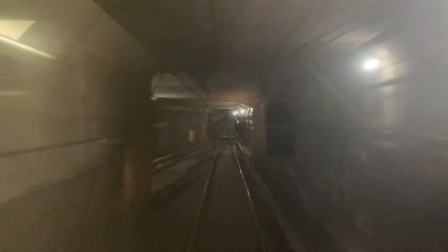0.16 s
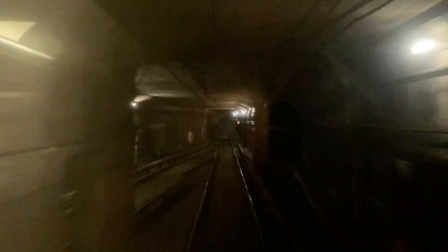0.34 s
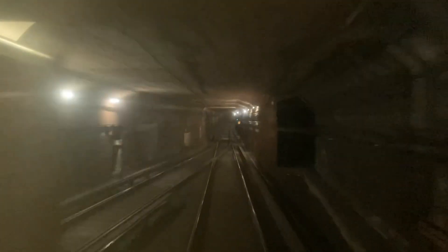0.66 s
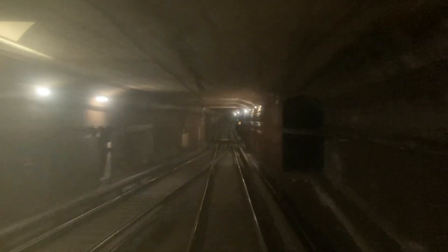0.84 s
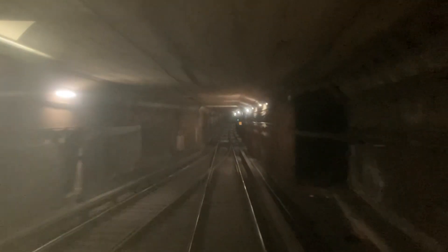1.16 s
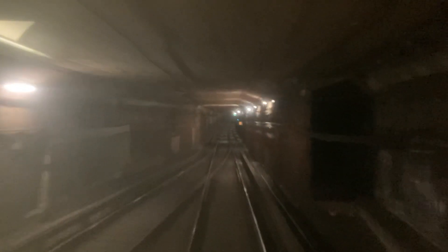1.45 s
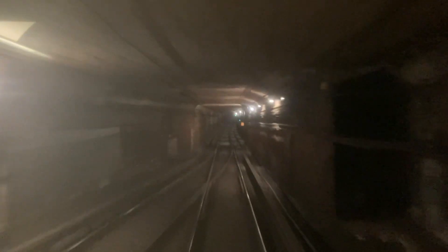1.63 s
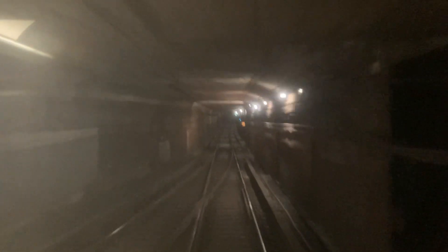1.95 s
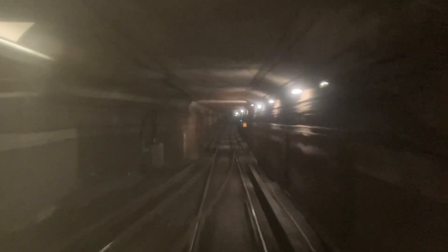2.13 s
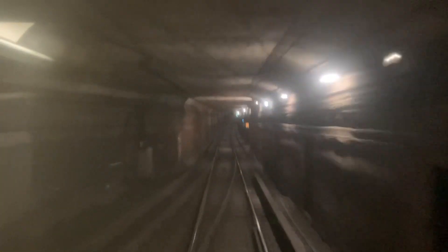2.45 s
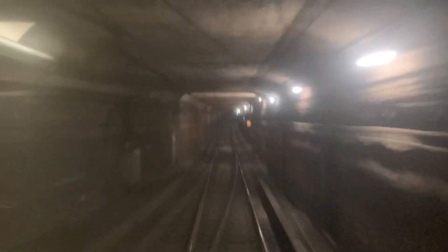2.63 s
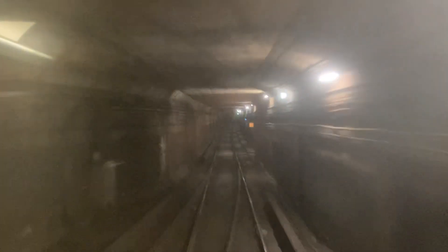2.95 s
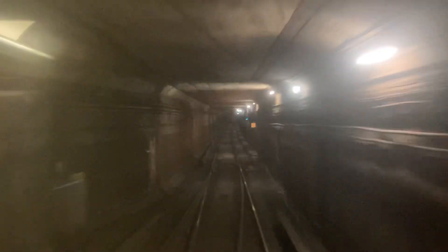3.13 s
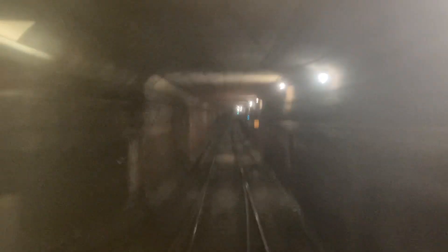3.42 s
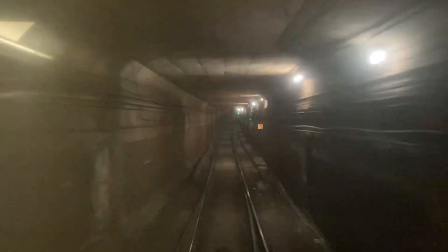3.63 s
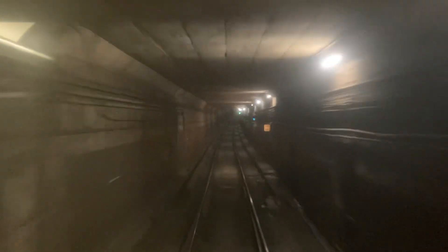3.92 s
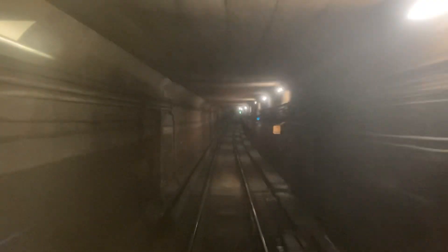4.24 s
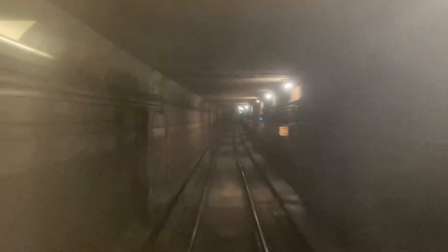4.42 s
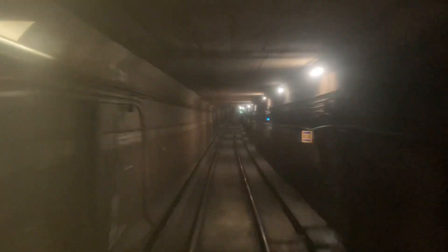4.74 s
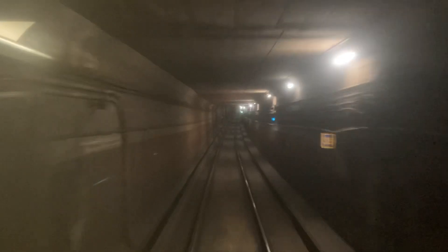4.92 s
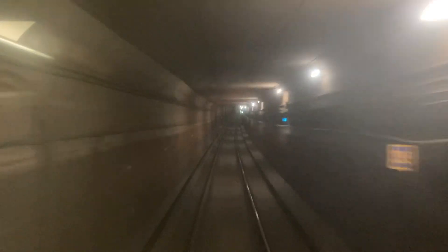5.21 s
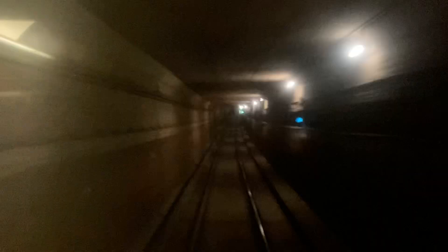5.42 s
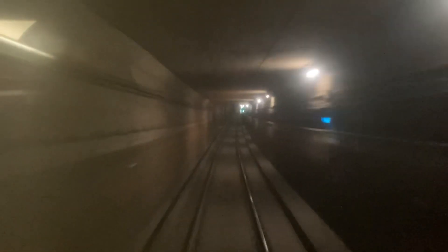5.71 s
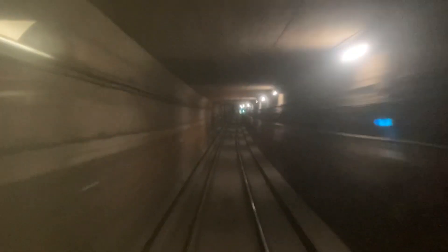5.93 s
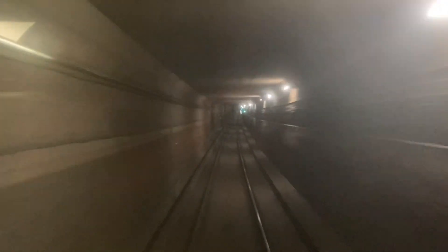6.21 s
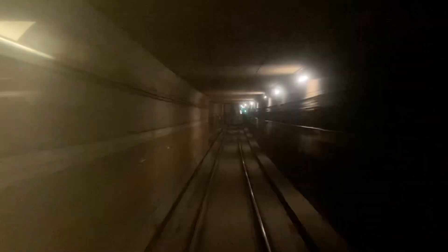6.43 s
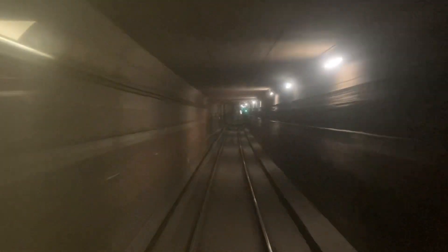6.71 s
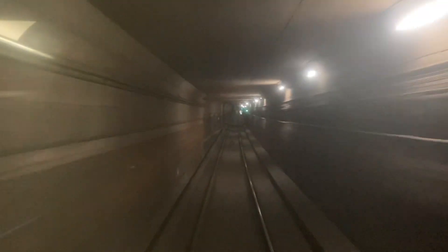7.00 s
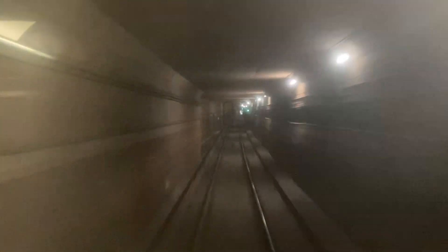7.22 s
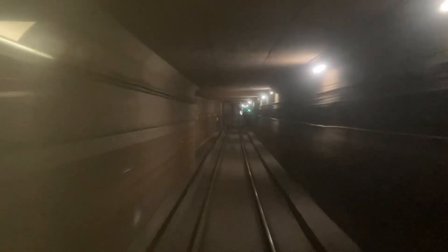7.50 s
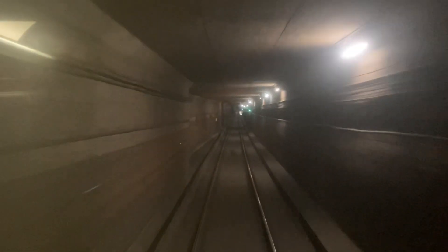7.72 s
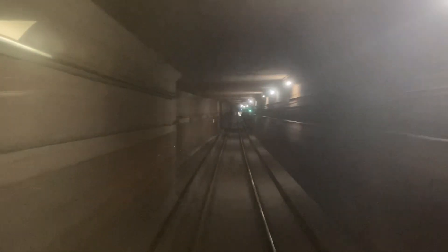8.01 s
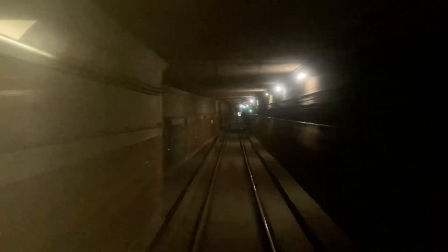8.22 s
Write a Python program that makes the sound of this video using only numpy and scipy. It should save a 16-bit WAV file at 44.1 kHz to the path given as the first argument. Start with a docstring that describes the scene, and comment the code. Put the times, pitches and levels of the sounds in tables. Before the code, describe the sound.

Heard inside the front cab, a subway train runs fast through a concrete tunnel. A low, shaking rumble and steel rolling roar continue throughout, with a faint electric whine early on. Thin flange squeals chirp over scattered knocks, then a dense burst of heavy clanks comes around three seconds and another thud at four. Afterwards the ride is steadier, hollow and booming, with a hoarse rubbing tone near the end.

```python
"""Subway cab in a tunnel

A subway train runs through a concrete tunnel, heard from inside the front cab.
Resonators driven by noise give the rumble and hollow boom of a car shaken by rough rails.
Decaying noise and struck modes knock at joints and points; gliding friction tones squeal at the flanges.
Close sine tones whine in the drive; coloured noise rolls, howls and booms between the walls.
The heaviest blows duck the gain, which creeps back at 1.5 dB per second."""
import sys
import numpy as np
from scipy import signal
from scipy.fft import rfft, irfft, next_fast_len
from scipy.io import wavfile
from scipy.ndimage import uniform_filter1d, minimum_filter1d

SR = 44100
rng = np.random.default_rng(int(sys.argv[2]) if len(sys.argv) > 2 else 0)


def dump(signal):
    """Clip the signal to [-1, 1] and save it as 16-bit WAV at the path in sys.argv[1]."""
    limited = np.clip(np.atleast_2d(signal).T, -1, 1)
    pcm = np.round(limited * 32767).astype(np.int16)
    wavfile.write(sys.argv[1], SR, pcm)


N = 368656
FFT_SIZE = next_fast_len(N)
TIME = np.arange(N) / SR
FREQS = np.maximum(np.arange(FFT_SIZE // 2 + 1) * SR / FFT_SIZE, 1)
# Levels in the tables are relative; the gains passed in scene() are added to them.


def from_db(db):
    """Decibel law: 20 dB is a tenfold amplitude."""
    return 10 ** (np.asarray(db) / 20)


def rms_one(x):
    """Normalisation: scale to an rms of 1."""
    return x / np.sqrt(np.mean(x ** 2) + 1e-20)


def in_time(rows):
    """Linear interpolation: each column of a curve at every sample."""
    s, *columns = np.transpose(rows)
    return [np.interp(TIME, s, c) for c in columns]


def at_hz(points):
    """Interpolation over log frequency: a spectrum read at every frequency."""
    hz, value = np.transpose(points)
    return np.interp(np.log(FREQS), np.log(hz), value)


def drift(rate_hz):
    """Low-passed noise: a random fluctuation of spread 1, drawn at every 32nd sample."""
    step = 32
    size = next_fast_len(N // step + 2)
    hz = np.arange(size // 2 + 1) * SR / (step * size)
    spectrum = rfft(rng.standard_normal(size)) / (1 + (hz / rate_hz) ** 4)
    slow = irfft(spectrum, size)
    return np.interp(np.arange(N) / step, np.arange(size), rms_one(slow))


# likeness of the two sides over frequency:
# frequency_hz, likeness (0-1), left_lead_rad, left_minus_right_db
STEREO_FIELD = [(40, .75, .3, .3), (87, .93, .35, 0), (120, .8, .25, .5), (180, .86, .25, .3),
                (230, .92, .4, 0), (285, .92, .45, -.3), (325, .94, .58, 0), (360, .96, .68, 0),
                (480, .98, .73, -.5), (600, .88, .7, 2), (690, .55, 1.1, 2.5), (880, .25, 2.5, 1.5),
                (1210, .1, 4, 1.8), (1960, .15, 5.5, -1), (3500, .08, 6.5, -2.5), (6200, 0, 3.5, -3.5),
                (9000, .3, 4.5, .5)]


def noise(gain):
    """Partial coherence: coloured stereo noise of rms 1, its sides related by frequency."""
    mid, side = rfft(rng.standard_normal((2, FFT_SIZE)))
    alike, lead_rad, balance_db = [at_hz([(row[0], row[k]) for row in STEREO_FIELD]) for k in (1, 2, 3)]
    alike = np.clip(alike, 0, .99)
    mid = mid * np.sqrt(1 + alike)
    side = side * np.sqrt(1 - alike)
    left = (mid + side) * from_db(balance_db / 2)
    right = (mid - side) * from_db(-balance_db / 2) * np.exp(-1j * lead_rad)
    return rms_one(irfft(np.array([left, right]) * gain, FFT_SIZE)[:, :N])


def steadied(x, span_s):
    """Power normalisation: even out slow swells of a noise, keeping its fine grain."""
    power = uniform_filter1d(np.mean(x ** 2, axis=0), max(int(span_s * SR), 2))
    return x / np.sqrt(power + 1e-6)


def wandering(sound, wander):
    """Uneven reading speed: resonances slide up and down a little as the track runs by."""
    reading = np.cumsum(1 + wander * drift(1.959))
    warped = reading / reading[-1] * TIME[-1]
    return np.array([np.interp(warped, TIME, side) for side in sound])


def resonant(modes, low_hz, top_hz):
    """Modal response: the powers of resonances add, falling steeply outside their range."""
    power = sum(from_db(db) ** 2 / (1 + ((FREQS ** 2 - hz ** 2) / (FREQS * width)) ** 2)
                for hz, width, db in modes)
    return np.sqrt(power / (1 + (FREQS / top_hz) ** 20) / (1 + (low_hz / FREQS) ** 20))


def blows(times, levels_db, t60, rise_s):
    """Exponential decay: blows build up quickly and die away; their powers add."""
    power = np.zeros(N)
    for s, db in zip(times, levels_db):
        start = max(int(s * SR), 0)
        age = TIME[:min(SR, N - start)]
        blow = from_db(db - 60 * age / t60) * (1 - np.exp(-age / rise_s))
        power[start:start + len(age)] += blow ** 2
    return np.sqrt(power)


def struck(times, levels_db, hz, width, rise_s):
    """Impulse response: one resonance builds up and rings after each blow, its strength varying at random."""
    clicks = np.full(N, 1e-18)
    clicks[(times * SR).astype(int)] = from_db(levels_db + 2 * rng.standard_normal(len(times)))
    decay = np.exp(-np.pi * width / SR)
    w = 2 * np.pi * hz / SR
    # a faster-dying ring is subtracted to soften the start
    ring, build_up = [signal.lfilter([0, np.sin(w)], [1, -2 * r * np.cos(w), r * r], clicks)
                      for r in (decay, decay * np.exp(-1 / (rise_s * SR)))]
    return ring - build_up


def bump(centre_s, spread_s):
    """Gaussian envelope: a brief contact that swells and fades symmetrically."""
    return np.exp(-np.minimum(((TIME - centre_s) / spread_s) ** 2, 50))


def from_left(x, lag_s):
    """Interaural delay: the sound reaches the right side slightly later."""
    return np.array([x, np.interp(TIME - lag_s, TIME, x)])


def cab(x, wet):
    """Reverberation: dense short reflections of the cab, different at each side."""
    age = TIME[:SR // 3]
    t60_s = 0.093
    echoes = rng.standard_normal((2, len(age))) * from_db(-60 * age / t60_s)
    echoes *= wet / np.sqrt(np.sum(echoes ** 2, axis=1, keepdims=True))
    echoes[:, 0] += 1  # direct sound
    heard = signal.fftconvolve(np.broadcast_to(x, (2, N)), echoes, axes=1)[:, :N]
    return heard / np.sqrt(1 + wet ** 2)


# tones of the drive: pitch_hz, level_db
WHINE_TONES = [(689, -51.5), (721.4, -46.5), (748.3, -46.5), (1136, -68)]
# load on the drive: time_s, level_db
DRIVE_LOAD = [(0, 3.5), (1.5, 0.5), (2.6, -2), (5.5, -4), (8.36, -3)]


def drive(whine_db, waver):
    """Beating: close wavering tones follow the load and swell differently at each side."""
    load_db, = in_time(DRIVE_LOAD)
    tones = 0
    for hz, db in WHINE_TONES:
        phase = 2 * np.pi * np.cumsum(hz * (1 + waver * drift(11))) / SR
        tones = tones + from_db(db) * np.sin(phase)
    swell_db = 2.8 * np.array([drift(7.8) for side in "LR"])
    return np.sqrt(2) * tones * from_db(load_db + whine_db + swell_db)


# hollow howl of the rail in the narrow bore: time_s, level_db
HOWL_LEVEL = [(0, -40), (2.15, -36.5), (2.27, -14), (2.38, -40.5), (5.2, -41), (5.5, -39.5), (6.4, -26.5),
              (6.65, -36.5), (7.0, -31), (7.55, -25), (7.85, -27), (8.36, -30)]
# resonances of the howl: frequency_hz, width_hz, level_db
HOWL_RESONANCES = [(368.5, 22, -0.5), (420, 38, 0), (545, 24, -2.5), (605, 24, -8.5)]


def howl(howl_db, wander):
    """Duct resonance: the rail howls between the walls at wandering pitches."""
    level_db, = in_time(HOWL_LEVEL)
    sound = steadied(noise(resonant(HOWL_RESONANCES, low_hz=340, top_hz=640)), span_s=0.18)
    return from_db(level_db + howl_db) * wandering(sound, wander)


# standing waves from wall to wall as the tunnel narrows: time_s, level_db
CROSS_BOOM_LEVEL = [(0, -40.5), (3.0, -47.5), (3.6, -31.5), (4.05, -11), (4.6, -15.5), (4.78, -14),
                    (5.0, -18), (5.45, -13.5), (6.0, -18), (6.3, -19), (7.3, -17), (8.05, -19.5),
                    (8.27, -15.5), (8.36, -17)]
# resonances across the tunnel: frequency_hz, width_hz, level_db
CROSS_RESONANCES = [(148, 35, 1.5), (176, 25, 2.5), (255, 50, -6), (320, 42, 1), (835, 35, -27)]


def cross_boom(boom_db):
    """Standing waves: pressure rises on one side of the tunnel while it falls on the other."""
    level_db, = in_time(CROSS_BOOM_LEVEL)
    response = resonant(CROSS_RESONANCES, low_hz=110, top_hz=900)
    wave = steadied(noise(response)[:1], span_s=.15)
    return from_db(level_db + boom_db) * wave * [[1], [-1]]


# wheels rolling on the rail: time_s, roar_db, hiss_db
ROLLING_LEVELS = [(0, -41.5, -54), (2.3, -37.5, -53), (2.7, -39.5, -55), (3.24, -38, -47),
                  (3.3, -40.5, -54.5), (3.6, -39, -54.5), (3.75, -33.5, -51), (4.08, -34.5, -53.5),
                  (4.2, -37, -57), (4.55, -35.5, -52.5), (4.95, -38.5, -54.5), (5.3, -38.5, -52.5),
                  (5.55, -33, -51), (6.25, -36.5, -55), (7.3, -37, -55), (8.36, -37, -56)]
# spectrum of the roar: frequency_hz, density_db (per Hz)
ROAR_SPECTRUM = [(340, -27), (520, 3.5), (700, 8.5), (830, 4.5), (960, 1), (1130, 4.5), (1380, 1.5),
                 (1700, -5), (2200, -13.5), (2900, -27), (4000, -41.5), (8000, -70.5)]
# spectrum of the hiss, also of rattling fittings: frequency_hz, density_db (per Hz)
HISS_SPECTRUM = [(1500, 6), (2600, 5), (3450, 1), (3900, -0.5), (4900, -3), (5800, -8.5), (6800, -10.5),
                 (7600, -16.5), (8400, -30), (9700, -39), (11100, -17), (12800, -40), (15500, -36.5)]


def rolling(roar_gain_db, hiss_gain_db, uneven_db, pits_db):
    """Roughness excitation: steel on steel roars and hisses; small rail pits add faint knocks."""
    roar_db, hiss_db = in_time(ROLLING_LEVELS)
    rail_db = uneven_db * drift(13)
    where, depth = rng.random((110, 2)).T
    pits = blows(where * TIME[-1], pits_db - 12 * depth, t60=0.11, rise_s=0.0012)
    roar_level = from_db(roar_db + roar_gain_db + rail_db) * np.hypot(1, pits)
    roar = roar_level * noise(from_db(at_hz(ROAR_SPECTRUM)))
    hiss = from_db(hiss_db + hiss_gain_db + rail_db / 2) * noise(from_db(at_hz(HISS_SPECTRUM)))
    return cab(roar + hiss, wet=.36)


# scuffs of the collector shoe on the live rail: centre_s, spread_s (to 1/e), level_db
SHOE_SCUFFS = [(1.64, 0.034, -56), (2.924, 0.052, -53.5), (5.176, 0.05, -51), (5.272, 0.072, -54),
               (5.487, 0.031, -45.5), (7.945, 0.018, -48.5)]
# spectrum of a scuff: frequency_hz, density_db (per Hz)
SCUFF_SPECTRUM = [(2500, -22), (5000, 9.5), (6800, 4.5), (7800, -5), (9000, -26), (15000, -32)]


def shoe():
    """Sliding friction: the collector shoe scuffs in short bright bursts of noise."""
    contact = sum(from_db(db) * bump(s, spread_s) for s, spread_s, db in SHOE_SCUFFS)
    return contact * noise(from_db(at_hz(SCUFF_SPECTRUM)))


def stick_slip(rows, orders, jitter, jitter_hz, flutter_db):
    """Stick-slip: a friction tone trembles in pitch and strength as the grip changes."""
    s, hz, level_db = np.transpose(rows)
    span = slice(max(int(s[0] * SR), 0), int(s[-1] * SR))
    t, out = TIME[span], np.zeros(N)
    touching = np.clip(np.minimum(t - s[0], s[-1] - t) / .01, 0, 1)
    pitch_hz = np.interp(t, s, hz) * (1 + jitter * drift(jitter_hz)[span])
    phase = 2 * np.pi * np.cumsum(pitch_hz) / SR
    tone = sum(from_db(db) * np.sin(round(k) * phase) for k, db in orders)
    strength = from_db(np.interp(t, s, level_db) + flutter_db * drift(28)[span])
    out[span] = np.sqrt(2) * tone * touching * strength
    return out


def arc(s, rise_s, fall_s, top_hz, start_sag_hz, end_sag_hz, db):
    """Contact pressure: pitch and level follow a flange pressing on and letting go (s, Hz, dB)."""
    u = np.linspace(-1, 1, 21)  # 0 is the firmest contact
    length_s = np.where(u < 0, rise_s, fall_s)
    sag_hz = np.where(u < 0, start_sag_hz, end_sag_hz)
    pitch_hz = top_hz - sag_hz * np.abs(u) ** 1.9  # exponent 1 = pointed, 2 = rounded
    return np.transpose([s + u * length_s, pitch_hz, db - 8 * u ** 2])


# flange squeals, one arc each:
# firmest_s, rise_s, fall_s, firmest_pitch_hz, start_sag_hz, end_sag_hz, level_db
SQUEAL_ARCS = [(0.353, 0.034, 0.052, 3020, -170, 229, -44), (0.831, .018, 0.026, 2970, 36, -84, -38.5),
               (.897, 0.041, 0.059, 3190, 176, 70, -36.5), (1.196, 0.071, 0.099, 3234, 303, 279, -39),
               (1.212, .025, .025, 3390, 60, 21, -45), (1.405, 0.12, .14, 3190, 279, 384, -36),
               (1.592, .025, 0.039, 2920, -40, 69, -40.5), (2.09, 0.069, 0.16, 2860, 15, 170, -41),
               (2.3, .07, .05, 3530, 12, 14, -47), (2.618, .04, 0.05, 3070, 168.5, -30, -43),
               (2.675, .025, .03, 2985, -1, 20, -34.5), (2.77, 0.048, .1, 2780, 4, 227, -44.5),
               (3.126, .1, 0.083, 2965, -23.5, 9, -33), (3.69, 0.095, 0.15, 2960, 20.5, 45.5, -38),
               (3.89, 0.049, 0.13, 2955, 42, 301, -41), (4.38, .2, 0.16, 3480, 44, 39, -53),
               (5.89, 0.071, 0.062, 2970, 123, 18, -46.5)]
# brief high squeaks of a wheel rim: centre_s, pitch_hz, level_db
RIM_SQUEAKS = [(2.14, 5400, -48), (4.82, 5430, -49)]
# hoarse song of a rubbing flange: time_s, base_pitch_hz, level_db
RUB_CURVE = [(7.17, 1394, -54), (7.24, 1414, -49), (7.32, 1426, -47.5), (7.39, 1417, -57),
             (7.48, 1440, -52), (7.6, 1425, -53.5), (7.68, 1420, -53), (7.76, 1402, -49), (7.86, 1410, -51),
             (7.96, 1425, -48), (8.06, 1404, -57)]
# overtones sounded over the base pitch: multiple, level_db
RUB_OVERTONES = [(2, 5), (3, -2.5), (4, -12.5), (5, -23)]


def flanges(squeal_db, rub_db):
    """Friction-driven vibration: flanges on the rail give gliding squeals, squeaks and a hoarse rub."""
    squeals = sum(stick_slip(arc(*row), [(1, 0.0024)], jitter=.011, jitter_hz=110, flutter_db=2.6)
                  for row in SQUEAL_ARCS)
    rub = stick_slip(RUB_CURVE, RUB_OVERTONES, jitter=.022, jitter_hz=75.3, flutter_db=0.5)
    out = from_db(squeal_db) * squeals + from_db(rub_db) * rub
    out = out * (1 + .35 * drift(140))  # rasp
    for s, hz, db in RIM_SQUEAKS:
        out = out + from_db(db) * bump(s, 0.018) * np.sin(2 * np.pi * hz * TIME)
    return cab(from_left(out, lag_s=.00005), wet=.55)


# wheels striking joints and points: start_s, thud_db (at 300 Hz), brightness_db_per_octave, clank_db
JOINT_BLOWS = [(1.409, -0.5, 1, -35.5), (1.446, 3.5, -4.5, -36), (1.964, -9.5, -5.5, -42),
               (2.174, -0.5, -5, -42.5), (2.256, 2.5, 3.5, -31.5), (2.311, -9, 5.5, -31.5),
               (2.444, 6.5, 7.5, -35), (2.845, 1.5, -5, -40.5), (3.038, 3, 10, -24.5),
               (3.065, 4.5, -3, -27), (3.143, 6.5, 1, -29), (3.203, 5, -6.5, -24.5), (3.226, 8, 10, -29.5),
               (3.251, 9.5, 6, -39.5), (3.384, 2, -2, -56), (3.524, 1.5, 0, -36),
               (3.557, -0.5, -1.5, -42.5), (3.665, -3, -1.5, -35), (3.915, 7.5, 2, -30.5),
               (3.996, 1, -1, -39), (4.066, 12, 1.5, -28.5), (4.143, 4, 5, -51.5), (4.711, -3.5, -3, -44),
               (4.761, -0.5, 1, -41), (5.03, -16.5, 0, -45), (5.396, 1.5, 11.5, -28.5),
               (5.413, -3.5, 18, -33), (5.466, -4.5, 5, -31.5), (5.568, -3, 9.5, -43.5),
               (5.649, -2, -2, -54), (6.027, -12.5, 10.5, -56), (6.287, -9, 10, -44),
               (7.025, -8.5, 0.5, -46), (7.19, -13.5, 2, -46), (7.559, -19, 21, -47), (8.259, -10, 0, -43)]


def thud_level(hz):
    """Spectral tilt: how hard each blow shakes a part that rings at this pitch, in dB."""
    _, strength_db, brightness, _ = np.transpose(JOINT_BLOWS)
    return strength_db + brightness * np.log2(hz / 300)


# spectrum of the clank: frequency_hz, density_db (per Hz)
CLANK_SPECTRUM = [(350, -30), (600, 6.5), (880, -0.5), (1150, 2), (1320, 3), (1550, -3), (1900, -8.5),
                  (2300, -11.5), (3000, -18.5), (4500, -23), (9000, -61.5)]
# ringing modes of a struck wheel: pitch_hz, t60_s, level_db
WHEEL_MODES = [(1235, .1, -6.5), (1323, 0.11, -1), (1480, 0.1, -7), (1530, 0.1, -8.5)]


def joints(clank_gain_db, ring_db):
    """Impact excitation: blows clank in the wheel set, ring the wheel and rattle loose fittings."""
    s, *_, clank_db = np.transpose(JOINT_BLOWS)
    level_db = clank_db + clank_gain_db
    rise_s = .0018
    clank = blows(s, level_db, t60=0.28, rise_s=rise_s) * noise(from_db(at_hz(CLANK_SPECTRUM)))
    rattling = blows(s, level_db - 19.5, t60=0.78, rise_s=0.0016)
    rattle = rattling * noise(from_db(at_hz(HISS_SPECTRUM)))
    ring = 0
    for hz, t60, db in WHEEL_MODES:
        width_hz = np.log(1000) / (np.pi * t60)
        ring = ring + struck(s, level_db + ring_db + db, hz, width_hz, rise_s)
    return cab(clank + rattle + ring, wet=0.83)


# swell of the floor rumble as the track bed changes: time_s, level_db
FLOOR_RIDE = [(0.0, -13), (0.35, -19), (0.7, -13.5), (1.0, -18), (1.65, -12), (2.2, -21), (2.53, -9.5),
              (2.8, -18), (3.22, -13), (3.55, -17.5), (4.1, -16), (5.2, -17.5), (5.8, -16), (7.05, -21.5),
              (7.35, -24.5), (8.36, -20.5)]
# spectrum of the floor rumble: frequency_hz, density_db (per Hz)
RUMBLE_SPECTRUM = [(12, -31), (23, -23), (33, -4.5), (47, -3.5), (62, 5.5), (73, -6), (83, 4), (94, 4.5),
                   (108, -9.5), (135, -16.5), (220, -20), (500, -86)]
# dips in the rail make the floor heave: start_s, level_db
FLOOR_HEAVES = [(1.42, -1), (1.61, -22), (1.7, -16), (2.48, -6), (4.169, -3), (4.761, -15), (5.65, -2),
                (5.83, -8), (6.009, 3), (6.14, -3), (6.27, -5), (6.57, -6), (7.009, -4)]
# shaking of the car, strongest over the points: time_s, underframe_db, bogie_db, panel_db
CAR_SHAKING = [(0.0, -19.5, -24, -30.5), (1.2, -21.5, -21, -27.5), (1.37, -16.5, -19.5, -23),
               (1.45, -14, -13, -20), (1.52, -17, -16.5, -24.5), (1.8, -17.5, -20, -26),
               (2.15, -18, -16.5, -26.5), (2.47, -18, -12, -15.5), (2.75, -20, -19.5, -23),
               (3.0, -14, -20.5, -24.5), (3.08, -9.5, -8.5, -11.5), (3.26, -5, -1, -12),
               (3.3, -22, -12.5, -23), (3.88, -14.5, -13.5, -23), (4.01, -13.5, -8.5, -15),
               (4.1, -15.5, -4.5, -15.5), (4.17, -19.5, -3, -18.5), (4.26, -20.5, -19.5, -18.5),
               (4.8, -22, -17, -19.5), (5.1, -21.5, -23, -25.5), (5.45, -12.5, -23.5, -22.5),
               (6.25, -30, -32.5, -26), (6.65, -21.5, -32, -29), (7.0, -17, -28, -26),
               (7.7, -24, -29, -33.5), (8.36, -21, -33, -22.5)]
# resonances of the underframe: frequency_hz, width_hz, level_db
UNDERFRAME_MODES = [(129, 46, 0), (170.7, 15.2, 4.5), (217, 45, -9)]
# resonances of the bogie: frequency_hz, width_hz, level_db
BOGIE_MODES = [(266, 30, -8.5), (309.6, 15, -1.5), (327.9, 5.8, -5), (360.3, 18, 0.5)]
# resonances of the body panels: frequency_hz, width_hz, level_db
PANEL_MODES = [(409.4, 23, -2), (417, 65, -8.5), (471.6, 16.8, 0.5), (576, 22, -13.5), (700, 24, -28)]


def car_body(rumble_db, frame_gain_db, bogie_gain_db, panel_gain_db, thud_db):
    """Forced vibration: rail roughness keeps each part ringing; blows at joints shake it harder."""
    floor_db, = in_time(FLOOR_RIDE)
    frame_db, bogie_db, panel_db = in_time(CAR_SHAKING)
    s = np.transpose(JOINT_BLOWS)[0]
    jolt_rate_hz, own_sway_db = 12.3, 1.1
    jolt_db = 1.93 * drift(jolt_rate_hz)  # uneven rail rocks the three parts together
    parts = [(resonant(UNDERFRAME_MODES, low_hz=103, top_hz=288), frame_db + frame_gain_db, thud_level(hz=160)),
             (resonant(BOGIE_MODES, low_hz=218, top_hz=387), bogie_db + bogie_gain_db, thud_level(hz=320)),
             (resonant(PANEL_MODES, low_hz=340, top_hz=690), panel_db + panel_gain_db, thud_level(hz=430))]
    heave = blows(*np.transpose(FLOOR_HEAVES), t60=0.17, rise_s=0.016)
    floor = from_db(floor_db + rumble_db + own_sway_db * drift(jolt_rate_hz))
    out = np.hypot(floor, heave) * steadied(noise(from_db(at_hz(RUMBLE_SPECTRUM))), span_s=0.28)
    for response, level_db, blow_db in parts:
        shaking = from_db(level_db + jolt_db + own_sway_db * drift(jolt_rate_hz))
        thud = blows(s, blow_db + thud_db, t60=0.069, rise_s=.005)
        ringing = wandering(steadied(noise(response), span_s=0.054), wander=.018)
        out = out + np.hypot(shaking, thud) * ringing
    return out


def knocks(knock_db, lag_s):
    """Modal superposition: a wheel impact, cushioned by the springs, swells in each car resonance."""
    s = np.transpose(JOINT_BLOWS)[0]
    out = 0
    for k, (hz, width, db) in enumerate(UNDERFRAME_MODES + BOGIE_MODES + PANEL_MODES):
        mode = struck(s, thud_level(hz) + db + knock_db, hz, width, rise_s=.009)
        out = out + (-1) ** k * mode  # neighbouring modes have opposite sign
    return from_left(out, lag_s)


def scene():
    """Superposition: everything heard in the cab adds up."""
    whine = drive(whine_db=-1.5, waver=.003)
    tunnel = howl(howl_db=0.5, wander=0.01468) + cross_boom(boom_db=-4.0)
    track = rolling(roar_gain_db=2.5, hiss_gain_db=12, uneven_db=1.5, pits_db=5.0)
    friction = shoe() + flanges(squeal_db=-4.0, rub_db=-7)
    impacts = joints(clank_gain_db=7.0, ring_db=-5.5) + knocks(knock_db=-14.0, lag_s=0.00022)
    body = car_body(rumble_db=0.5, frame_gain_db=-3.5, bogie_gain_db=-2.0, panel_gain_db=-2.0, thud_db=-10.5)
    return whine + tunnel + track + friction + impacts + body


def gain_control(x):
    """Level compression: turn down whatever exceeds the threshold, then creep back up."""
    threshold_db, recovery_db_per_s, listen_s = -6.5, 1.5, 0.046
    power = uniform_filter1d(np.mean(x ** 2, axis=0), max(int(listen_s * SR), 2))
    excess_db = np.maximum(10 * np.log10(np.maximum(power, 1e-12)) - threshold_db, 0)
    recovery_db = recovery_db_per_s * TIME
    return x * from_db(recovery_db - np.maximum.accumulate(excess_db + recovery_db))


def limiter(x, size):
    """Peak limiting: hold single peaks under the ceiling with a brief, smooth dip."""
    ceiling = .95
    gain = ceiling / np.maximum(np.abs(x).max(axis=0), ceiling)
    gain = minimum_filter1d(gain, 2 * size)
    return x * uniform_filter1d(uniform_filter1d(gain, size), size)


def record(dry):
    """Dynamic and band limits: gain control, limiter and soft edges, then the top is cut."""
    edges = np.clip(np.minimum(TIME, TIME[-1] - TIME) / .002, 0, 1)
    held = limiter(gain_control(dry), size=128) * edges
    # 70 dB down from 15600 Hz upward
    return signal.sosfilt(signal.cheby2(12, 70, 15600, fs=SR, output="sos"), held)


dry = scene()
out = record(dry)
dump(out)
```